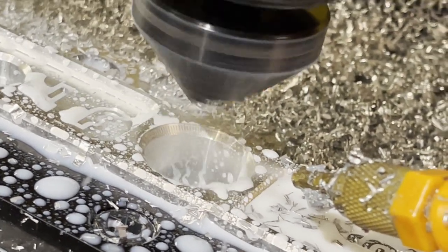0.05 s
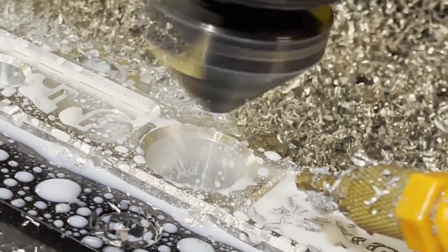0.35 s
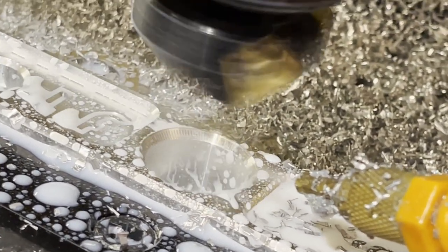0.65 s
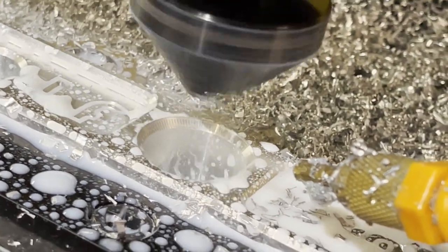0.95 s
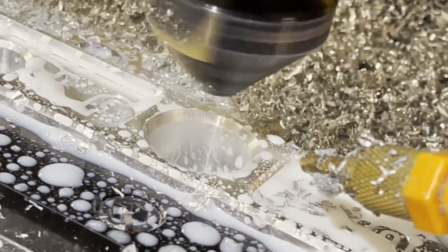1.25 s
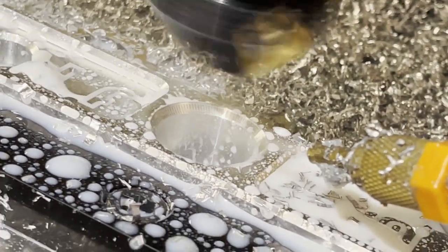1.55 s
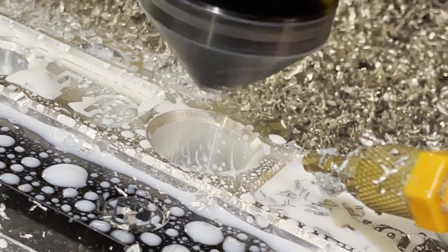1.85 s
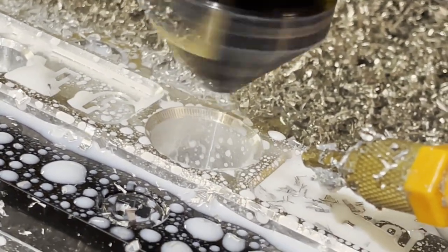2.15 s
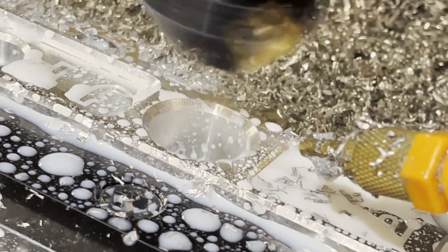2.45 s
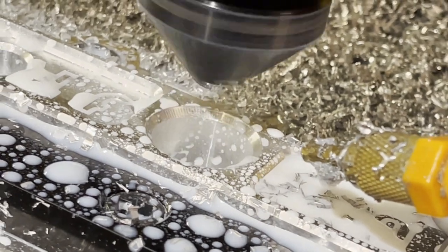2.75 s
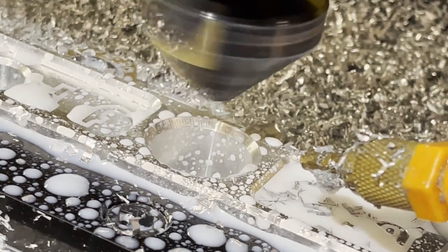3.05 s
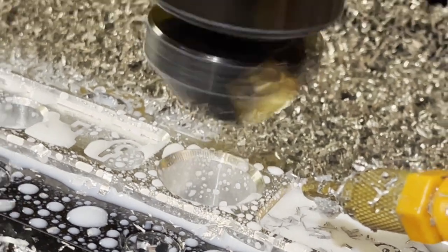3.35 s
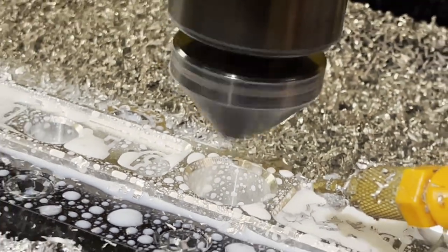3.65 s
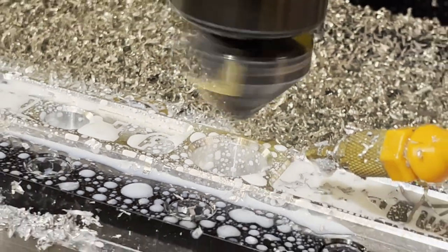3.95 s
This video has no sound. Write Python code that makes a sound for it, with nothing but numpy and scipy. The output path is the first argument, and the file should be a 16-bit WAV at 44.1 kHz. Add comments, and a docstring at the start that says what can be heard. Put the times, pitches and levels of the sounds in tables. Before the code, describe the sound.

A jet of coolant and air hisses and splashes onto a metal workpiece, close up inside a milling machine's steel enclosure. Halfway through it dies down in steps with short spurts, leaving motor tones, pump hum and throbbing whines.

```python
"""A jet of coolant and air blasts onto the workpiece in a milling machine's steel enclosure.
Its dense rain of tiny impacts splashes, rasps and hisses, lightly chopped by the turning tool,
rings the wet metal and throws short spurts. From 2 s it dies down in steps and leaves the
machine's bed: running noise, motor tones, the pump's hum and two throbbing drive whines."""
import sys
import numpy as np
from scipy import signal
from scipy.fft import rfft, irfft
from scipy.io import wavfile

SR = 44100
rng = np.random.default_rng(int(sys.argv[2]) if len(sys.argv) > 2 else 0)


def unload_audio(sound):
    """Save the sound as a 16-bit wav file, at the path given as the first command line argument."""
    columns = np.transpose(np.atleast_2d(sound))
    # keep every value between -1 and 1, then stretch to whole-number steps
    steps = np.round(np.clip(columns, -1, 1) * 32767)
    wavfile.write(sys.argv[1], SR, steps.astype(np.int16))


N = 176400
TIME = np.arange(N) / SR
FREQS = np.fft.rfftfreq(N, 1 / SR)


def amp(db):
    """Decibels to gain."""
    return 10 ** (np.asarray(db) / 20)


def curve_at(points, hz):
    """A frequency curve, interpolated on a log axis."""
    f, value = np.transpose(points)
    return np.interp(np.log(hz + 1), np.log(f + 1), value)


def drift(rate_hz, size=2048):
    """A random modulator of rms 1, from 1 Hz up to about the given rate."""
    f = np.fft.rfftfreq(size, N / SR / size)
    slow = irfft(rfft(rng.standard_normal(size)) * (f > 1) / (1 + (f / rate_hz) ** 4), size)
    return np.interp(np.arange(N) * size / N, np.arange(size), slow / slow.std())


def fader(points, flutter_db, flutter_hz):
    """A level ride with random flutter on top, as in a turbulent stream."""
    return amp(np.interp(TIME, *np.transpose(points)) + flutter_db * drift(flutter_hz))


def enclosure(count=40, mean_delay_s=.022, treble_wet=.09):
    """Close reflections off the steel walls put a fine ripple on the spectrum."""
    delay_s = (.5 + rng.random(count)) * mean_delay_s
    taps = np.zeros(N)
    taps[(delay_s * SR).astype(int)] = rng.standard_normal(count)
    wet = treble_wet * FREQS / (FREQS + 900)
    return np.sqrt(1 - wet) + np.sqrt(wet) * rfft(taps) / np.linalg.norm(taps)


# How alike left and right sound: f/Hz, coherence/0-1
STEREO_COHERENCE = [(100, .97), (300, .94), (500, .7), (900, .64), (1450, .4), (1900, .9), (3500, .96),
                    (5000, .98), (5800, .8), (7200, .78), (8000, .98), (8800, .98), (9300, .82),
                    (10800, .88), (11700, .99), (12300, .98), (13300, .76), (14500, .82), (15300, .99)]
# Phase lead of the left channel: f/Hz, phase/rad
STEREO_LEAD = [(300, 0), (800, .1), (1200, -.8), (1800, 0), (2900, .42), (4000, 0), (5100, 0), (5800, -.9),
               (6600, -.9), (7400, -1.9), (7900, -3), (8800, -3.3), (9200, -3.9), (10000, -4.7),
               (11500, -6.2), (12400, -6.35), (14400, -8.5), (15300, -9.4)]
# Pan, left minus right: f/Hz, level/dB
STEREO_PAN = [(60, 0.7), (300, 2.6), (500, 1.5), (900, -0.5), (2000, -3.2), (3500, -0.2), (8000, 0)]
# Flat EQ, for noise that is filtered afterwards: f/Hz, level/dB
FLAT_EQ = [(20, 0), (20000, 0)]

def noise(eq, grain_db=0):
    """A dense rain of tiny impacts of uneven size, coloured and spread in stereo."""
    grain = amp(grain_db * np.repeat(rng.standard_normal(N), 32)[:N])
    impacts = rng.standard_normal((2, N)) * grain
    mid, side = rfft(impacts / impacts.std())
    coherence = curve_at(STEREO_COHERENCE, FREQS)
    mid *= np.sqrt((1 + coherence) / 2) * enclosure()
    side *= np.sqrt((1 - coherence) / 2) * enclosure()
    pan = amp(curve_at(STEREO_PAN, FREQS) / 2) * np.exp(.5j * curve_at(STEREO_LEAD, FREQS))
    stereo = np.array([(mid + side) * pan, (mid - side) / pan])
    return irfft(stereo * amp(curve_at(eq, FREQS)) * np.sqrt(SR / 2), N)


def tone(hz, db, waver, waver_hz=9.8, spread_rad=0.61):
    """A complex sine in stereo; the waver share of its power fluctuates, the rest holds steady."""
    envelope = np.sqrt(1 - waver) + np.sqrt(waver / 2) * (drift(waver_hz) + 1j * drift(waver_hz))
    phase = 2 * np.pi * rng.random() + spread_rad * hz / (hz + 400) * rng.standard_normal((2, 1))
    pan = amp(curve_at(STEREO_PAN, hz) * np.array([[.5], [-.5]]))
    return np.sqrt(2) * amp(db) * pan * envelope * np.exp(1j * (2 * np.pi * hz * TIME + phase))


# Colour of the running noise: f/Hz, level/dB
MACHINE_EQ = [(20,-130), (30,-116), (38,-98), (50,-75.5), (62,-77), (80,-67.5), (100,-75.5), (130,-67.5),
              (170,-69), (240,-64.5), (300,-71), (430,-77.5), (620,-67.5), (900,-72.5), (1100,-78),
              (1300,-75.5), (1800,-74), (2100,-71.5), (2500,-78.5), (3500,-77.5), (4500,-79.5), (5300,-77),
              (6700,-86), (7500,-81), (9000,-95), (11500,-95), (14500,-101), (15600,-100)]
# Motor and pump tones, pre-fader: f/Hz, level/dB, waver/0-1
MOTOR_TONES = [(128,-59.5,0.5), (275,-54,0.75), (484.5,-56,0.65), (383,-53,0.8), (607,-54,.85),
               (753.5,-46,0.73), (826,-55.5,0.97), (916,-50.5,0.97), (1172,-53.5,0.83), (2107,-54.5,.3),
               (2230,-59,0.5), (2448,-54,0.5), (2640,-52.5,0.7), (2970,-52,0.34), (3350,-57,0.6),
               (4150,-52,.6), (4340,-62,0.6), (5250,-56,0.5)]
# Fader ride on those tones: t/s, level/dB
MOTOR_RIDE = [(0,-0.5), (3.3,1), (3.6,-0.5), (3.72,-1), (4,-1.5)]

def machine(tone_trim_db=-0.3):
    """The bed: broad running noise with the wavering tones of motors and pump."""
    running = noise(MACHINE_EQ, grain_db=1.0) * amp(1.6 * drift(25))
    tones = sum(tone(*row).real for row in MOTOR_TONES)
    return running + tones * amp(tone_trim_db + np.interp(TIME, *np.transpose(MOTOR_RIDE)))


# Fader ride on the hum: t/s, level/dB
HUM_RIDE = [(0,-1), (.25,-5), (.42,4), (.56,-9), (.69,6.5), (.82,-12), (1.02,6), (1.18,-4.5), (1.33,3.5),
            (1.45,-10), (1.55,1.5), (2.2,-5.5), (2.45,2), (2.7,-1.5), (3.08,-1), (3.3,-1), (3.88,-6),
            (3.96,4)]

def pump_hum():
    """The low hum of the pump, swelling and sinking."""
    return tone(hz=204.6, db=-45, waver=0.15).real * fader(HUM_RIDE, flutter_db=0.5, flutter_hz=13)


# Throbbing whines: f/Hz, level/dB, beat/Hz, neighbour gain/0-1, one crest/s, fade end/s, fade length/s
DRIVE_WHINES = [(1883, -47.2, 3.7, .8, 3.32, 4.2, .55), (2047, -46.8, 11, .62, 3.17, 3.8, .15)]

def drive_whines():
    """Two drive whines, each beating against a close neighbour: one slowly, one fast."""
    out = 0
    for hz, db, beat_hz, neighbour, crest_s, end_s, fade_s in DRIVE_WHINES:
        beat = 1 + neighbour * np.exp(2j * np.pi * beat_hz * (TIME - crest_s))
        fade = np.clip((end_s - TIME) / fade_s, 0, 1)
        out += (tone(hz, db, waver=0.048) * beat).real * fade
    return out


# Resonances of the wet workpiece and panels, pre-fader: f/Hz, width/Hz, peak level/dB
METAL_MODES = [(478, 36, -54.5), (601, 20, -58), (821, 40, -55.5), (1286, 43, -58), (3040, 88, -59),
               (3547, 67, -55.5)]
# How hard the jet rings them: t/s, level/dB
METAL_RIDE = [(0,1), (.7,0), (1.35,-0.5), (1.95,-0.5), (2.3,-5), (2.6,-4.5), (2.8,-10), (3.2,-11), (4,-35)]

def metal_ring(wander_hz=5.8, wander_rate_hz=8.9):
    """The jet rings a few resonances of the metal, which wander as coolant washes over it."""
    source, out = rfft(noise(FLAT_EQ)), 0
    for hz, width, db in METAL_MODES:
        ring = 2 * np.fft.ifft(source * amp(db) / (1 + 2 * ((FREQS - hz) / width) ** 2), N)
        wander_cycles = np.cumsum(wander_hz * drift(wander_rate_hz)) / SR
        out += (ring * np.exp(2j * np.pi * wander_cycles)).real
    return out * fader(METAL_RIDE, flutter_db=1.8, flutter_hz=11)


# Spurt cues, timed at their peaks: t/s, length/s, level/dB, f/Hz, half-width/Hz
SPURT_CUES = [(1.373, 0.16, -53.5, 462, 50), (1.598, .10, -58, 3300, 420), (2.593, 0.094, -62, 850, 200),
              (2.902, .08, -66, 780, 220), (3.023, .13, -71, 4820, 231), (3.073, 0.15, -62, 710, 160),
              (3.11, 0.13, -64, 3570, 220), (3.19, 0.25, -68.5, 3460, 360), (3.233, 0.052, -61, 3480, 298),
              (3.57, 0.14, -69, 3750, 280), (3.71, 0.11, -58, 615, 85), (3.703, 0.14, -64, 895, 100)]

def spurts():
    """Brief swells of coolant noise: bright spits and hollow gurgles."""
    source, out = rfft(noise(FLAT_EQ)), 0
    for peak_s, length_s, db, hz, half_width in SPURT_CUES:
        band = irfft(source / (1 + ((FREQS - hz) / half_width) ** 4), N)
        band = np.roll(band, rng.integers(N), axis=1)  # each spurt gets its own stretch of noise
        swell = np.exp(-(2 * (TIME - peak_s) / length_s) ** 2)
        out += amp(db) * band * swell
    return out


# Colour of the jet's four layers, low to high: f/Hz, level/dB
SPLASH_EQ = [(200,-85.5), (340,-67), (420,-61.5), (500,-66), (580,-62.5), (690,-62), (930,-62), (1120,-60),
             (1400,-65.5), (1700,-70), (2500,-69), (6000,-110)]
RASP_EQ = [(1000,-77.5), (1500,-79), (1640,-64.5), (1800,-59), (1950,-68.5), (2100,-61), (2400,-62),
           (2530,-69), (2650,-60.5), (2800,-58.5), (3170,-60.5), (3280,-58), (3560,-59), (3720,-65),
           (4000,-74.5), (7000,-105)]
SPRAY_EQ = [(2000, -89.5), (2800, -77.5), (3250, -69), (3550, -65), (3750, -68), (4050, -73.5),
            (4450, -73.5), (5000, -69), (5400, -77), (5750, -74.5), (6800, -77), (9000, -135),
            (16000, -110)]
HISS_EQ = [(3000,-100), (5500,-77), (6150,-73), (6450,-76), (6750,-73.5), (7080,-76), (7450,-70.5),
           (7900,-74.5), (8500,-75), (9300,-70.5), (9900,-70.5), (10450,-67), (10650,-68.5), (10850,-64),
           (11100,-66), (11600,-61.5), (12100,-62.3), (12350,-65), (12850,-66), (13300,-71.5), (13800,-70),
           (14600,-71.5), (15200,-66.5), (15700,-65.5)]
# Fader rides on those layers: t/s, level/dB
SPLASH_RIDE = [(0,0), (0.5,0.5), (1,0.2), (1.3,-0.6), (1.7,-1), (2.2,0), (2.42,-3), (2.6,-3), (2.72,-4.5),
               (2.88,-2.5), (2.98,-6.5), (3.07,-6), (3.33,-17), (3.45,-4.5), (3.63,-9.5), (3.7,-6.5),
               (3.81,-18), (4,-15)]
RASP_RIDE = [(0, 2), (0.5, 0.5), (1, 1.5), (1.6, 0.3), (1.9, -0.8), (2.2, -5), (2.42, -8.5), (2.6, -8.5),
             (2.75, -25), (3.3, -23), (4, -39)]
SPRAY_RIDE = [(0, 2), (1.9, 2), (2.3, -1.5), (2.6, 0), (2.72, -2), (2.95, -1.5), (3.1, -1), (3.25, 0),
              (3.36, -3), (3.5, -3.5), (3.63, -3), (3.68, -16), (4, -16)]
HISS_RIDE = [(0, -0.9), (1, -1.1), (1.7, -1.7), (2.1, -0.7), (2.4, -1.7), (2.64, -1.0), (2.71, -5),
             (3, -5.5), (3.12, -7.5), (3.29, -7), (3.38, -17), (3.62, -16.5), (3.69, -31), (3.79, -39),
             (4, -32)]
# Tremolo from the tool cutting through the jet: rate/multiple of spindle speed, depth/0-1
TOOL_CHOP = [(2, .05), (4, .04), (5, .03)]

def jet(spindle_hz=25.6):
    """Coolant and air hit the work as splash, rasp, spray and hiss; the tool chops the upper three."""
    chop = 1 + sum(depth * np.cos(2 * np.pi * (multiple * spindle_hz * TIME + rng.random()))
                   for multiple, depth in TOOL_CHOP)
    splash = noise(SPLASH_EQ, grain_db=1.0) * fader(SPLASH_RIDE, flutter_db=1.53, flutter_hz=28)
    rasp = noise(RASP_EQ, grain_db=0.5) * fader(RASP_RIDE, flutter_db=0.3, flutter_hz=25)
    spray = noise(SPRAY_EQ, grain_db=1.7) * fader(SPRAY_RIDE, flutter_db=0.9, flutter_hz=45)
    hiss = noise(HISS_EQ, grain_db=0.85) * fader(HISS_RIDE, flutter_db=0.86, flutter_hz=24)
    return splash + chop * (rasp + spray + hiss)


def scene():
    """The mix: the jet and what it rings, over the running machine."""
    return jet() + metal_ring() + spurts() + machine() + pump_hum() + drive_whines()


def record(dry):
    """A steep high cut on the mix."""
    high_cut = signal.firwin(1023, cutoff=15740, window=("kaiser", 9), fs=SR)
    return signal.oaconvolve(dry, high_cut[None], "same")


dry = scene()
out = record(dry)
unload_audio(out)
```